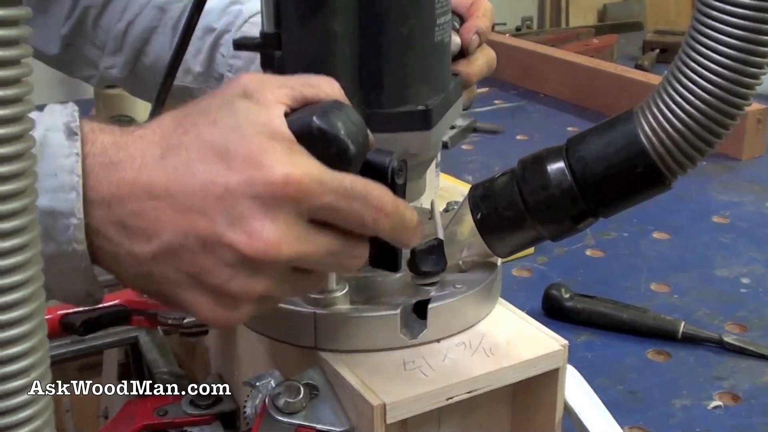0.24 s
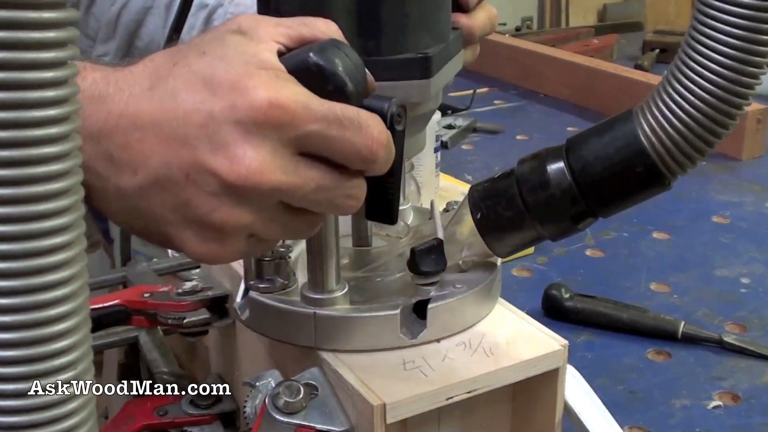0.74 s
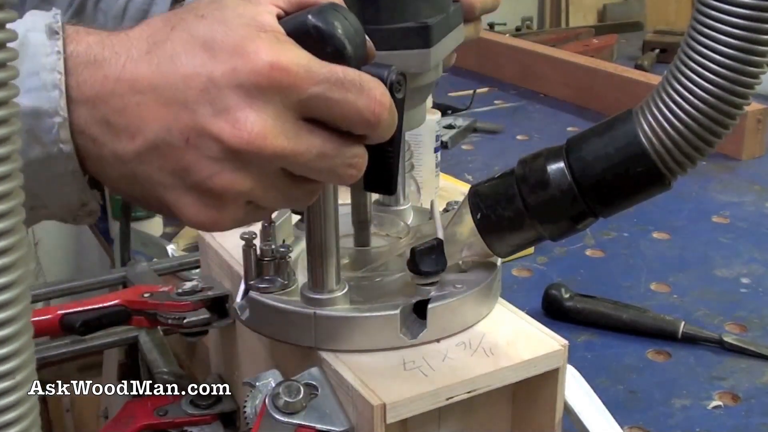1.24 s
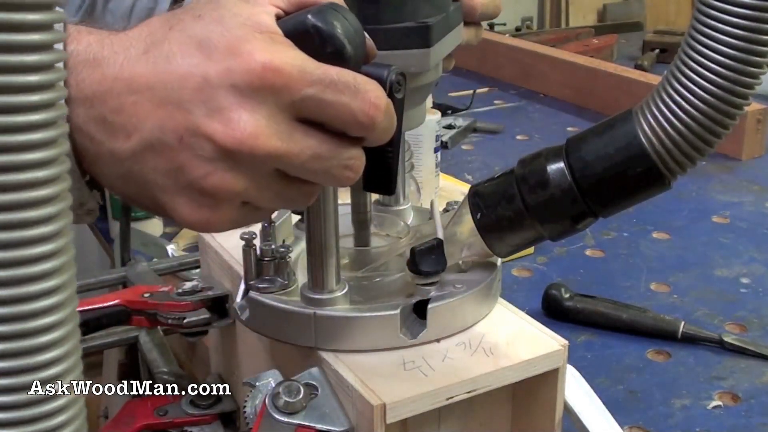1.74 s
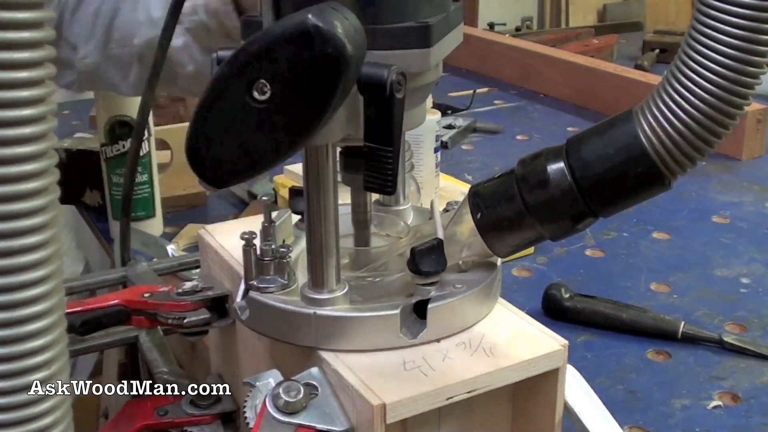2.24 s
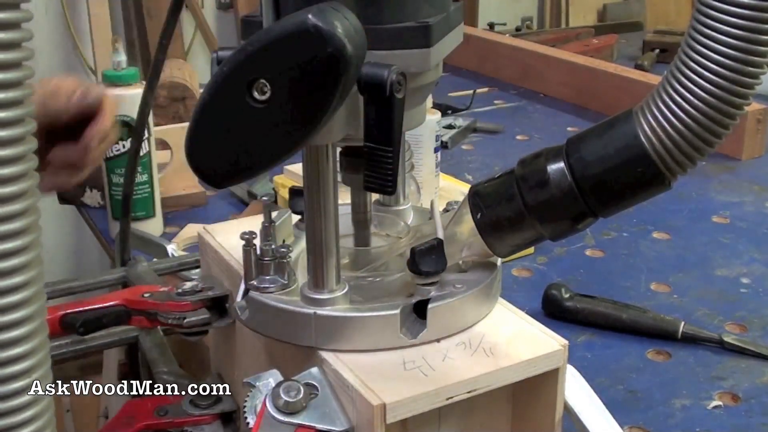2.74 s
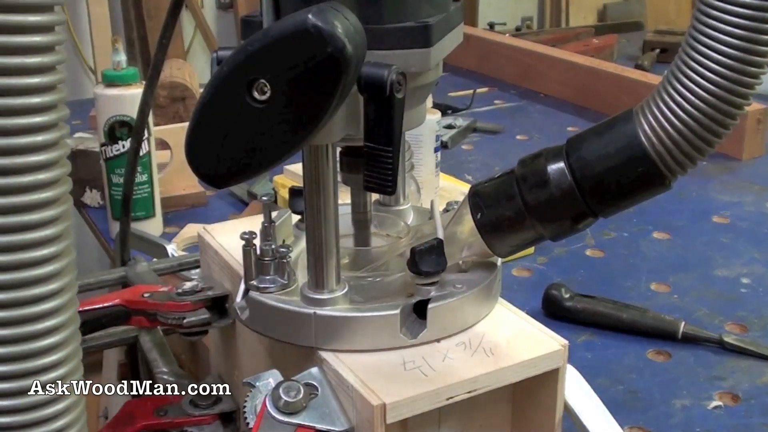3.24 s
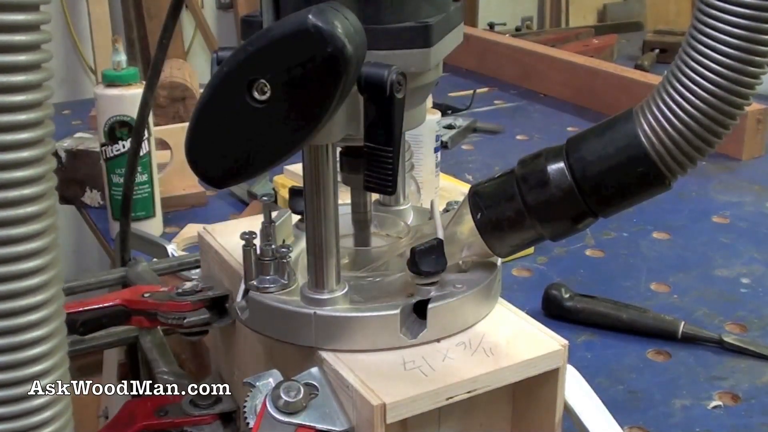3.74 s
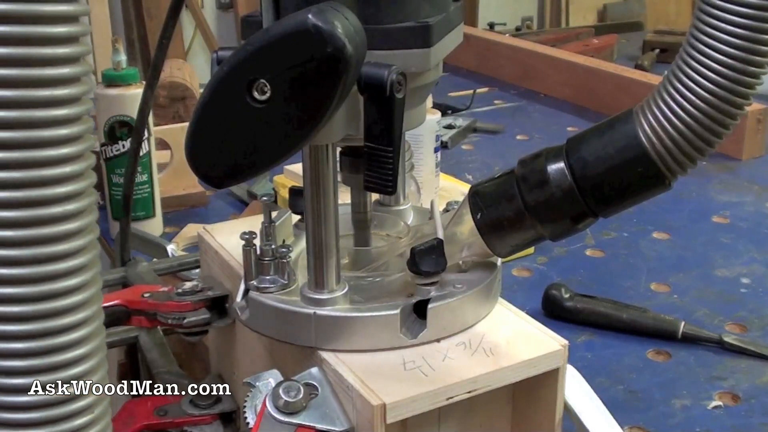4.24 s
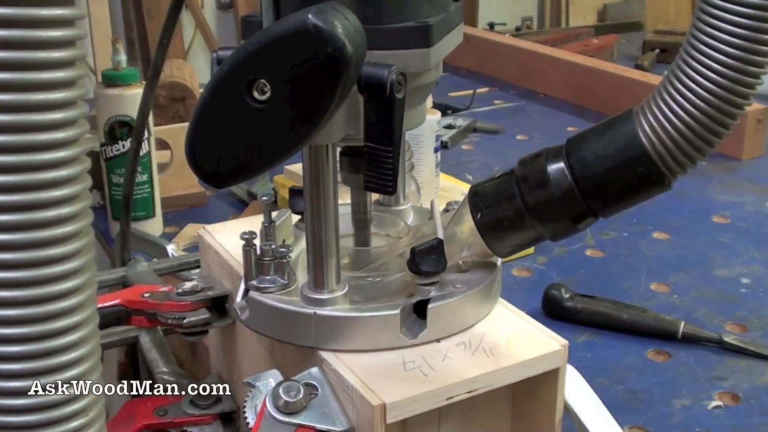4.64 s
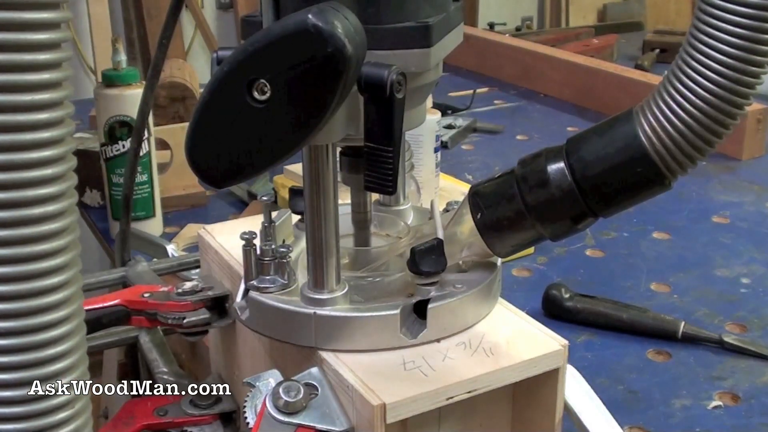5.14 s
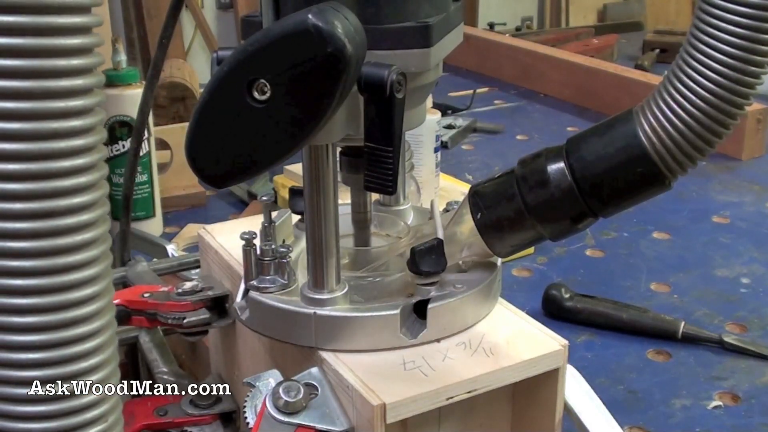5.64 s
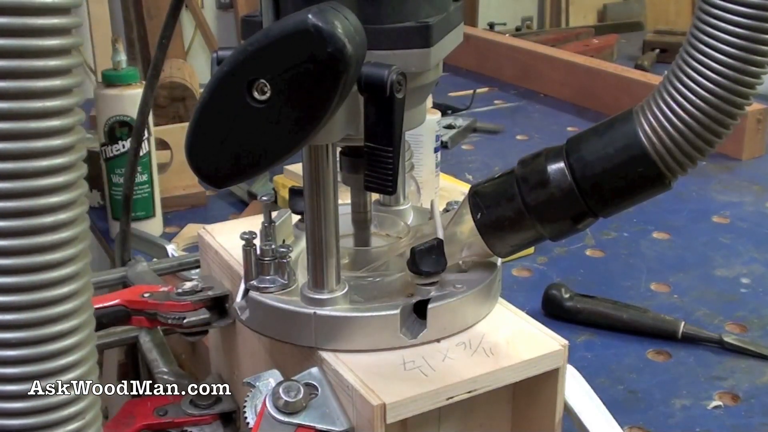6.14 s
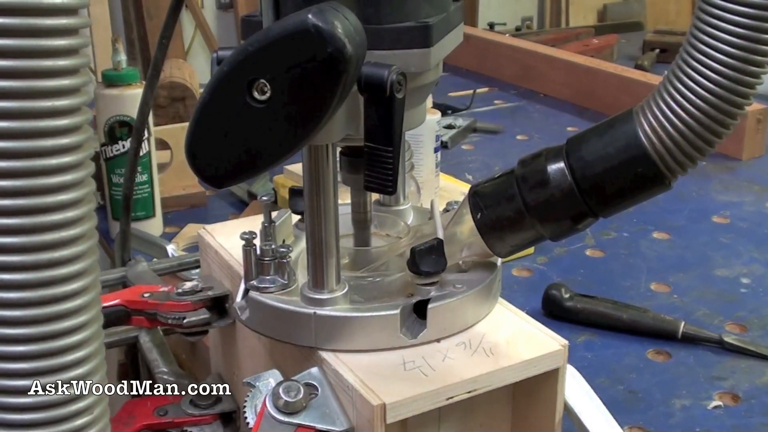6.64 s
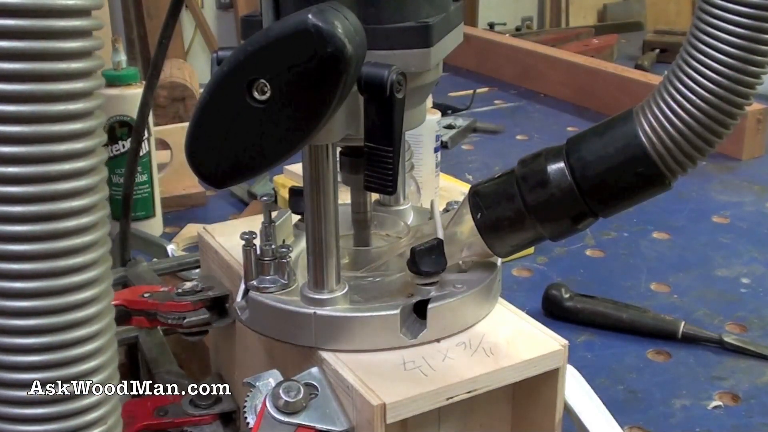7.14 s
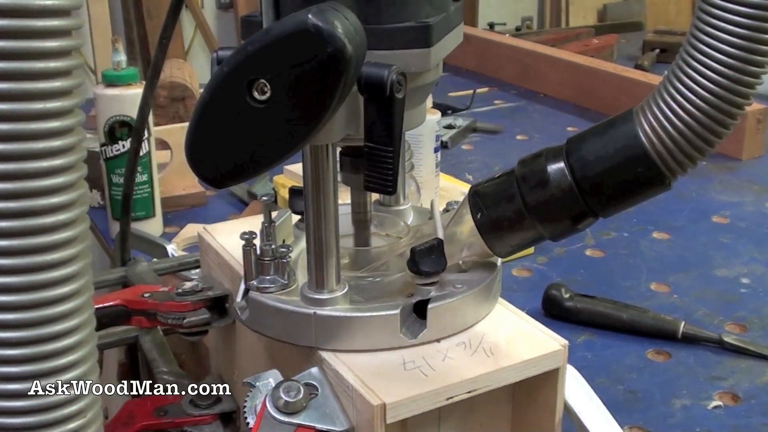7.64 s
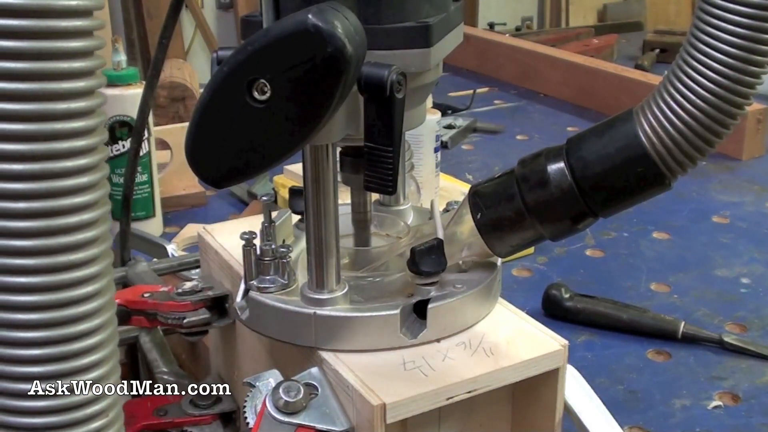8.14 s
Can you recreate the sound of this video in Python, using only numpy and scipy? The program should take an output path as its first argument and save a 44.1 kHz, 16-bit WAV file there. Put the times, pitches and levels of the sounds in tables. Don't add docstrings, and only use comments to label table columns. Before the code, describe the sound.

A handheld router bites off its last wood chips, whines free, then switches off and glides slowly down in pitch as a vacuum's roar follows.

```python
import sys
import numpy as np
from scipy import signal
from scipy.fft import rfft, irfft, next_fast_len
from scipy.io import wavfile

SR = 44100
rng = np.random.default_rng(int(sys.argv[2]) if len(sys.argv) > 2 else 0)


def level_to_linear(level):
    exponent = np.asarray(level, float) / 20
    return 10 ** exponent


def store_wav(level_fs):
    pcm = np.round(np.clip(np.atleast_2d(level_fs), -1, 1) * 32767)
    wavfile.write(sys.argv[1], SR, pcm.T.astype(np.int16))


N = 370881


def seconds():
    return np.arange(N) / SR


def phase(hz):
    return 2 * np.pi * np.cumsum(hz) / SR


def rms_one(x):
    return x / np.sqrt(np.mean(x ** 2) + 1e-20)


def in_time(rows):
    time_s, *columns = np.transpose(rows)
    return [np.interp(seconds(), time_s, column) for column in columns]


def at_hz(points, hz):
    points_hz, points_db = np.transpose(points)
    return np.interp(np.log(hz + 1), np.log(points_hz), points_db)


def colour(x, points):
    size = next_fast_len(N)
    gain = level_to_linear(at_hz(points, np.fft.rfftfreq(size, 1 / SR)))
    return irfft(rfft(x, size) * gain, size)[..., :N]


def drift(rate_hz):
    step, settle = 40, 2000
    pole = np.exp(-2 * np.pi * rate_hz * step / SR)
    noise = rng.standard_normal(N // step + settle + 2)
    slow = signal.lfilter([1], [1, -2 * pole, pole * pole], noise)[settle:]
    return np.interp(np.arange(N) / step, np.arange(len(slow)), rms_one(slow))


def rush(spectrum, low_hz, high_hz, flicker_db):
    x = colour(rng.standard_normal(N), spectrum)
    bandpass = signal.butter(4, [low_hz, high_hz], "band", fs=SR, output="sos")
    return x / np.std(signal.sosfilt(bandpass, x)) * level_to_linear(flicker_db * drift(21))


def tone(angle, db, wobble_db):
    level = np.sqrt(2) * level_to_linear(db + wobble_db * drift(40))
    return level * np.sin(angle + 2 * np.pi * rng.random())


def resonate(x, modes):
    for hz, width_hz, db in modes:
        x = x + (level_to_linear(db) - 1) * signal.lfilter(*signal.iirpeak(hz, hz / width_hz, SR), x)
    return x


def shaft_speed():
    free_hz, sag_hz, unload_s, recover_s, off_s = 336.15, .55, .4, .4, 1.6009
    drag_per_s, drag_scale_hz, drag_centre_hz = .11289, 198.01, 32.47
    t = seconds()
    start = np.arctan((free_hz - drag_centre_hz) / drag_scale_hz)
    coast = drag_centre_hz + drag_scale_hz * np.tan(start - drag_per_s * np.maximum(t - off_s, 0))
    return coast - sag_hz * np.clip(1 - (t - unload_s) / recover_s, 0, 1)


# (time [s], level [dB])
CHIPS_DB = [
    (0, -18.5),
    (.2, -24),
    (.4, -30),
    (.6, -30),
    (.8, -35),
    (1.2, -42),
    (8.41, -70),
]
# (frequency [Hz], density [dB per Hz])
CHIP_SPECTRUM = [(60, -64), (500, -24), (900, -14), (1400, 0), (1900, 4), (2500, 3), (4000, -7), (9000, 2),
                 (13000, -16)]
# (time [s], level [dB])
BITE_DB = [
    (0, -35),
    (.3, -29.5),
    (.7, -36.5),
    (1.1, -50),
    (8.41, -80),
]
# (frequency [Hz], level [dB])
BIT_GLIDE = [(160, -68), (380, -54), (470, -53), (520, -43), (600, -45), (672, -41)]
# (multiple of shaft [-], level re cutter [dB])
FLUTE_OVERTONES = [(4, 5), (5, -3), (6, 5), (7, -35), (8, -16), (18, -19)]


def cutter(angle, shaft_hz):
    chips_db = in_time(CHIPS_DB)[0]
    cutter_db = np.maximum(at_hz(BIT_GLIDE, 2 * shaft_hz), in_time(BITE_DB)[0])
    biting_db = np.clip(chips_db + 23, -60, 0) * 0.68
    tones = tone(2 * angle, cutter_db, 2.5)
    for multiple, db in FLUTE_OVERTONES:
        tones += tone(multiple * angle, cutter_db + biting_db + db, 1.0)
    pulses = 1 + 0.75 * np.sin(2 * angle)
    chips = level_to_linear(chips_db) * pulses * rush(CHIP_SPECTRUM, 500, 13000, 1.9)
    return tones, chips


# (frequency [Hz], level [dB])
IMBALANCE_GLIDE = [(80, -70), (112, -60), (155, -55), (165, -38), (182, -50), (212, -44.5), (290, -48.5),
                   (336, -53)]
# (frequency [Hz], level [dB])
SLOT_GLIDE = [(1420, -60), (1530, -34.5), (1960, -32), (2150, -47), (2500, -45), (3400, -41), (4000, -36),
              (5400, -43)]
# (time [s], level [dB])
BURIED_DB = [
    (0, -31),
    (.27, -33),
    (.36, -46),
    (.8, -60),
    (8.41, -80),
]


def armature(angle, shaft_hz):
    imbalance = tone(angle, at_hz(IMBALANCE_GLIDE, shaft_hz), 1.4)
    slots = tone(16 * angle, at_hz(SLOT_GLIDE, 16 * shaft_hz), 1.9)
    return imbalance + slots + tone(16 * angle, in_time(BURIED_DB)[0], 1.5)


# (time [s], level [dB])
WHISTLE_DB = [(0, -28), (.33, -26.5), (.5, -16.5), (1.1, -16.5), (1.6, -19.5), (1.85, -18.5), (2.2, -13.5),
              (2.45, -17), (2.6, -25.5), (3.1, -18.5), (3.6, -22.5), (4.1, -19), (4.45, -23), (5.1, -15.5),
              (6.2, -19.5), (7.6, -23), (8.0, -25.5), (8.41, -37)]
# (time [s], change [dB], half width [s])
ROOM_CROSSINGS = [(.08, -10, .04), (.36, -8, .02), (.74, -1.5, .08), (1.8, 4, .03), (1.98, -14, 0.056),
                  (2.5, -12, .03), (2.74, 4, 0.021), (2.9, -4, .08), (3.03, 7, 0.022), (3.13, 5, .03),
                  (3.22, 4.5, 0.059), (3.58, -7, 0.019), (3.62, -10, 0.018), (4.15, -14, 0.017),
                  (4.36, -7, 0.09), (4.45, -8, .05), (4.58, -5.5, 0.046), (5.93, 3.5, 0.072),
                  (6.6, 4.5, 0.059), (6.67, -5, .025), (6.73, 3, 0.064), (6.85, 2.5, .05), (7.12, 5, 0.043),
                  (7.46, 6, 0.018), (7.52, -6, .03), (7.61, 7, 0.024), (7.8, -16, .03), (7.96, -8, 0.046),
                  (8.09, -8, .03)]
# (time [s], level [dB])
OCTAVE_DB = [(0, -58), (1.8, -56), (2.1, -42), (3, -38), (3.3, -46), (4.0, -35), (4.4, -46), (5.3, -44),
             (5.75, -32), (6.1, -45), (8.41, -50)]
# (multiple of shaft [-], level re whistle [dB])
SIDE_TONES = [(17, -50), (19, -41), (21, -21)]


def fan_whistle(angle):
    blade_db = in_time(WHISTLE_DB)[0]
    for time_s, db, half_s in ROOM_CROSSINGS:
        blade_db += np.interp(seconds(), [time_s - half_s, time_s, time_s + half_s], [0, db, 0])
    whistle = tone(20 * angle, blade_db, 1.3) + tone(40 * angle, in_time(OCTAVE_DB)[0], 2.0)
    side_tones = sum(tone(multiple * angle, blade_db + db, 3.4) for multiple, db in SIDE_TONES)
    return whistle, side_tones


# (time [s], brush hiss [dB], hose rush [dB])
AIR_DB = [(0, -21.5, -30.5), (.28, -18.5, -33.5), (.5, -20.5, -44), (1.0, -21, -41), (1.6, -19.5, -42),
          (1.9, -22, -34), (2.0, -19, -30.5), (2.2, -24, -36.5), (2.5, -22, -30), (2.85, -22, -25.5),
          (3.1, -24.5, -26.5), (3.7, -24.5, -25), (4.4, -24, -22.5), (5.2, -26, -22.5), (6.2, -25.5, -22.5),
          (7.1, -24.5, -23.5), (7.8, -31.5, -27), (8.41, -29.5, -30)]
# (shaft speed [Hz], level [dB])
FAN_SHARE_DB = [(78, 6), (108, 1), (122, 6), (135, 8), (220, 10), (290, 4.5), (336, 1)]
# (frequency [Hz], density [dB per Hz])
FAN_SPECTRUM = [(60, -61), (180, -19.5), (300, -21), (520, -13.5), (700, -11.5), (2070, -4.5), (2600, -3),
                (4600, -5.5), (5300, -4.5), (7000, -6), (9200, -7), (9900, -16.5), (12500, -17.5),
                (15500, -31.5)]
# (frequency [Hz], density [dB per Hz])
HISS_SPECTRUM = [(800, -42), (1900, -13.5), (2800, -21), (3700, -6.5), (5200, -21), (6000, -10),
                 (7900, -12), (9200, -14), (9900, -17), (12000, -17), (13500, -36), (15500, -23)]
# (frequency [Hz], width [Hz], lift [dB])
BODY_MODES = [(1260, 120, 4), (3120, 400, 3), (4010, 250, 4), (5300, 350, -3), (6050, 400, 5),
              (8060, 300, 3)]


def fan_and_brush_noise(angle, shaft_hz):
    hiss_db = in_time(AIR_DB)[0]
    slowing_db = 20 * np.log10(shaft_hz / shaft_hz.max())
    fan_db = hiss_db + at_hz(FAN_SHARE_DB, shaft_hz) - 5 + 1.3 * slowing_db
    fan = level_to_linear(fan_db) * rush(FAN_SPECTRUM, 7000, 15000, .4)
    throb = 1 + 0.2 * np.sin(angle)
    hiss = level_to_linear(hiss_db - 10.0 - 0.17 * slowing_db) * throb * rush(HISS_SPECTRUM, 5700, 15000, 0.59)
    return resonate(fan + hiss, BODY_MODES)


# (multiple of shaft [-], level above the rest [dB])
PROUD_BARS = [(25, 3), (29, 1), (30, 2), (32, 7), (33, 7), (35, 3), (38, 2), (40, 6), (41, 2), (43, 3),
              (48, 6), (54, 3), (57, 3), (60, 3), (64, 5), (65, 5), (66, 3), (67, 2), (70, 3), (77, 3),
              (88, 2), (90, 2), (91, 3), (95, 2), (96, 5), (97, 3), (99, 2), (109, 3)]
# (frequency [Hz], level of one multiple [dB])
HOUSING_COLOUR = [(1500, -52), (3500, -47), (4300, -44), (4900, -39), (5450, -44), (6000, -39), (6900, -46),
                  (8300, -42), (9300, -47), (9900, -58), (12000, -59), (15500, -73)]
# (time [s], level [dB])
SONG_DB = [(0, -9), (1.7, -9), (2.3, -4), (3.5, 2), (5.7, 4), (6.8, 3), (7.5, 3), (8.41, -2)]


def brush_song(angle, shaft_hz):
    proud_db = dict(PROUD_BARS)
    block = 64
    coarse_hz = shaft_hz[::block]
    blocks = len(coarse_hz)
    turn = np.exp(1j * angle).astype(np.complex64)
    spin = turn ** 21
    out = np.zeros(N)
    for k in range(22, 120):
        spin = spin * turn
        plain_db = rng.normal(-1.5, 1.8) - .04 * max(k - 65, 0)
        spread_db = 1.5 if k in proud_db else 3
        fading_db = np.interp(np.arange(blocks), np.linspace(0, blocks, 40), rng.normal(0, spread_db, 40))
        level_db = at_hz(HOUSING_COLOUR, k * coarse_hz) + proud_db.get(k, plain_db) + fading_db
        level = np.repeat(np.sqrt(2) * level_to_linear(level_db), block)[:N]
        start = np.complex64(np.exp(2j * np.pi * rng.random()))
        out += level * (spin * start).real
    return level_to_linear(in_time(SONG_DB)[0]) * out


def router():
    shaft_hz = shaft_speed()
    angle = phase(shaft_hz)
    cutter_tones, chips = cutter(angle, shaft_hz)
    whistle, side_tones = fan_whistle(angle)
    direct = cutter_tones + armature(angle, shaft_hz) + whistle
    noise = fan_and_brush_noise(angle, shaft_hz) + chips
    return direct, noise, side_tones + brush_song(angle, shaft_hz)


# (frequency [Hz], level [dB])
IMPELLER_GLIDE = [(118, -63), (128, -52), (148, -45), (158, -58), (173, -41), (190, -62), (208, -41),
                  (255, -37.5), (280, -54), (340, -45)]
# (frequency [Hz], density [dB per Hz])
HOSE_SPECTRUM = [(60, -65), (130, -13.5), (200, -15.5), (350, -15), (460, -7.5), (700, -1), (920, -4),
                 (1220, -3), (1690, -7), (2460, -5), (3300, -13), (4300, -27), (7000, -60)]
# (frequency [Hz], width [Hz], lift [dB])
HOSE_MODES = [(676, 51, 5), (1220, 32, 1.5), (830, 36, 2)]


def vacuum():
    run_hz, off_s, drag = 341.6, 3.17, .0018
    hose_db = in_time(AIR_DB)[1]
    shaft_hz = run_hz / (1 + run_hz * drag * np.maximum(seconds() - off_s, 0))
    motor_db = at_hz(IMPELLER_GLIDE, shaft_hz) + 1.4 * (hose_db + 25)
    motor = tone(phase(shaft_hz), motor_db, 2.6)
    return motor + level_to_linear(hose_db - 4.5) * resonate(rush(HOSE_SPECTRUM, 400, 1207, 0.86), HOSE_MODES)


# (time [s], level [dB])
RUMBLE_DB = [
    (0, -62),
    (2, -64),
    (3, -61),
    (5, -62),
    (5.6, -58),
    (6.4, -56),
    (6.7, -51),
    (7.5, -50),
    (8.41, -50),
]
# (frequency [Hz], density [dB per Hz])
RUMBLE_SPECTRUM = [(20, -22), (45, -17), (60, -6), (90, -28), (115, 2.5), (165, 4.5), (190, -6), (300, 4),
                   (450, 3.5), (700, -12)]
# (frequency [Hz], level [dB])
MACHINE_HUM = [(56.5, -69), (113, -50.5), (168, -54), (226, -50), (281, -49), (339, -47.5), (394, -47)]


def workshop():
    level_db = in_time(RUMBLE_DB)[0]
    lift_db = level_db - level_db[-SR:].mean()
    hum = sum(tone(2 * np.pi * hz * seconds(), db + 1.6 * lift_db, .8) for hz, db in MACHINE_HUM)
    return hum + level_to_linear(level_db - 3.5) * rush(RUMBLE_SPECTRUM, 40, 128, 1.2)


def echoes(x):
    t60_s, first_echo_s = .3, .003
    t = np.arange(SR // 2) / SR
    reply = rng.standard_normal(len(t)) * level_to_linear(-60 * t / t60_s) * (t > first_echo_s)
    return signal.fftconvolve(x, reply / np.linalg.norm(reply))[:N]


# (frequency [Hz], side re mid [dB])
SIDE_COLOUR = [(60, -35), (250, -25), (700, -18.5), (1300, -23), (2200, -20), (2900, -29), (6200, -28),
               (7900, -21.5), (9600, -20.5), (15000, -24)]


def scene():
    direct, noise, gliding = router()
    wet = level_to_linear(-7)
    in_room = (gliding + wet * echoes(gliding)) / np.hypot(1, wet)
    mid = direct + noise + in_room + vacuum() + workshop()
    side = colour(echoes(mid), SIDE_COLOUR) + .015 * mid
    side += 0.073 * np.roll(direct, 2)
    return np.array([mid + side, mid - side])


def band_limit(x):
    return signal.sosfilt(signal.butter(12, 17080, fs=SR, output="sos"), x)


def record(dry):
    bass_hz, top_hz, ceiling = 60, 16050, .95
    thin = signal.sosfilt(signal.butter(2, bass_hz, "high", fs=SR, output="sos"), dry)
    limited = ceiling * np.tanh(thin / ceiling)
    mix = signal.sosfilt(signal.cheby2(16, 70, top_hz, fs=SR, output="sos"), limited)
    return band_limit(mix)


dry = scene()
out = record(dry)
store_wav(out)
```